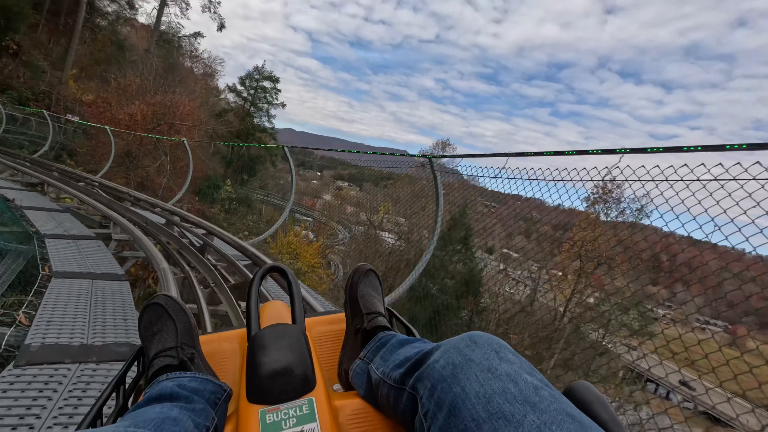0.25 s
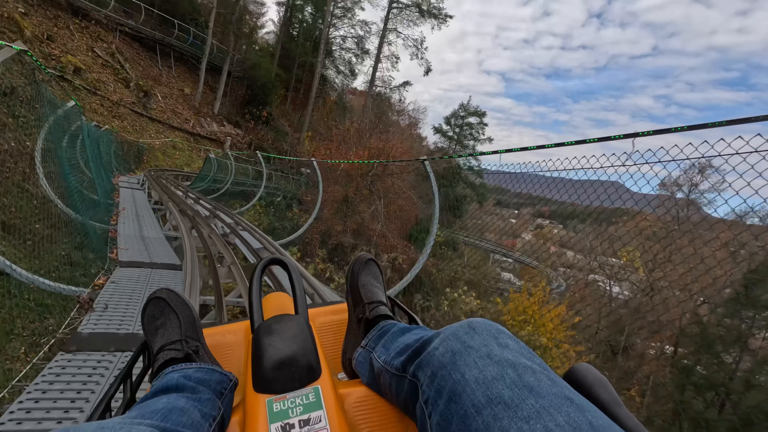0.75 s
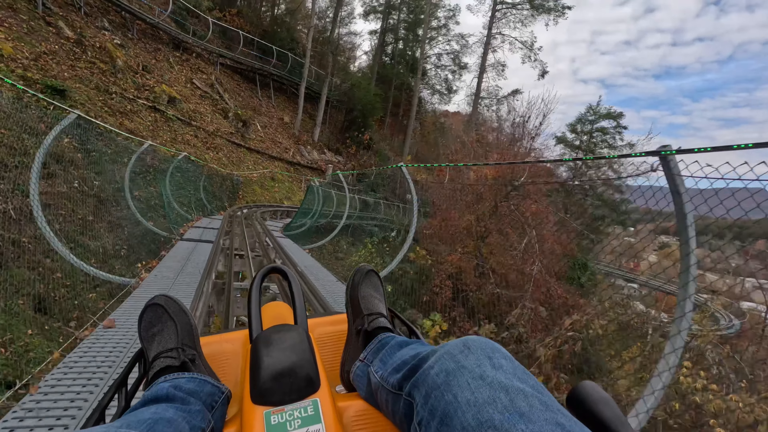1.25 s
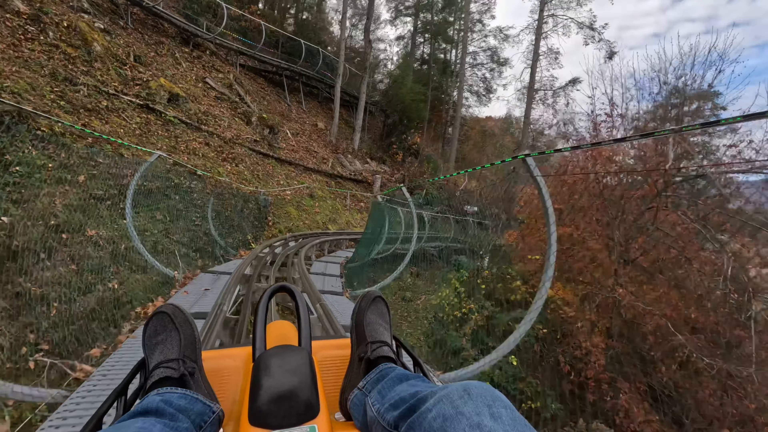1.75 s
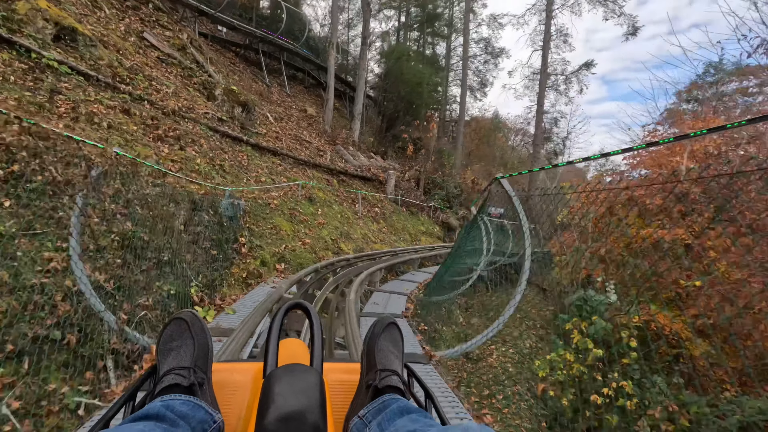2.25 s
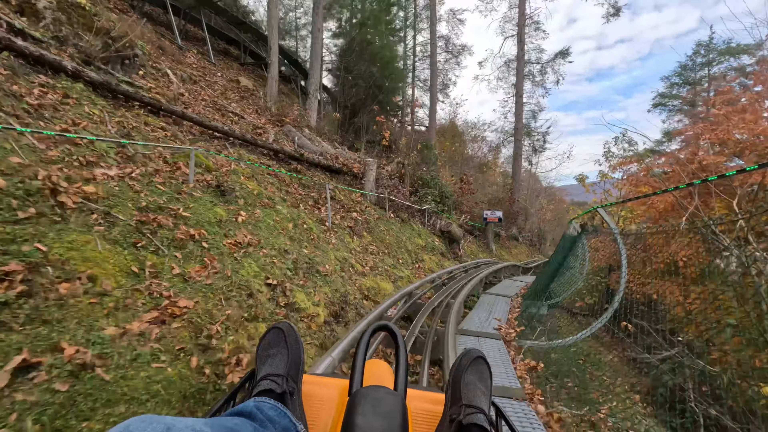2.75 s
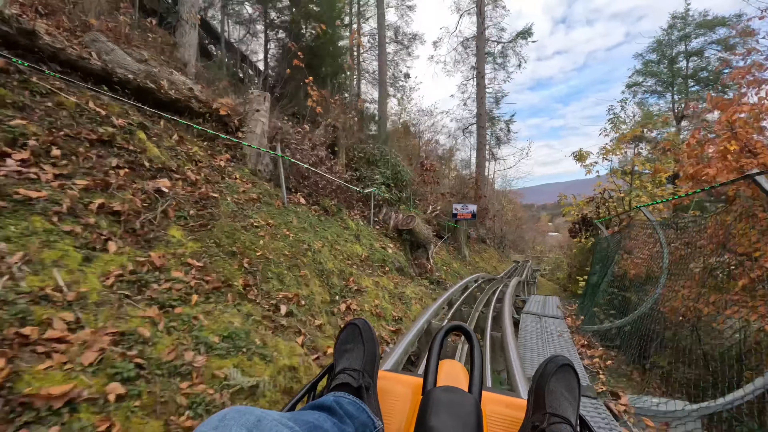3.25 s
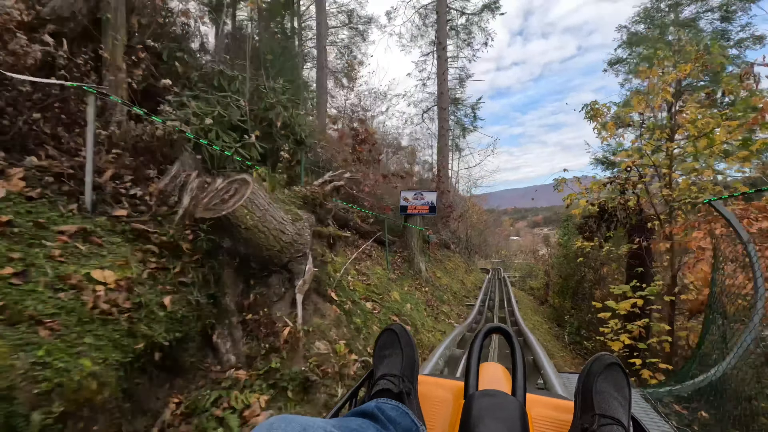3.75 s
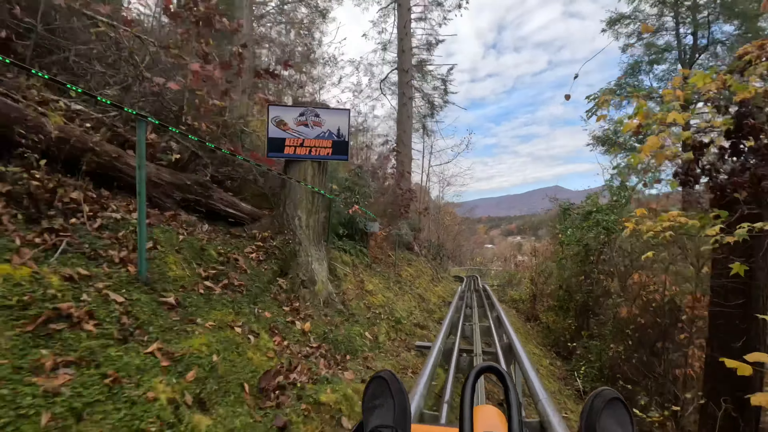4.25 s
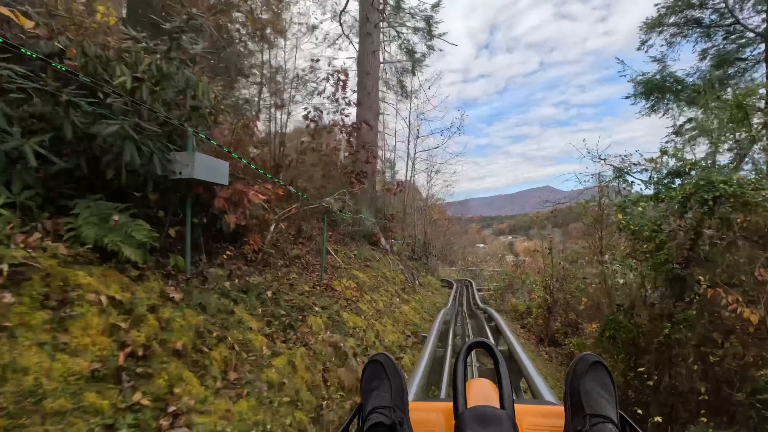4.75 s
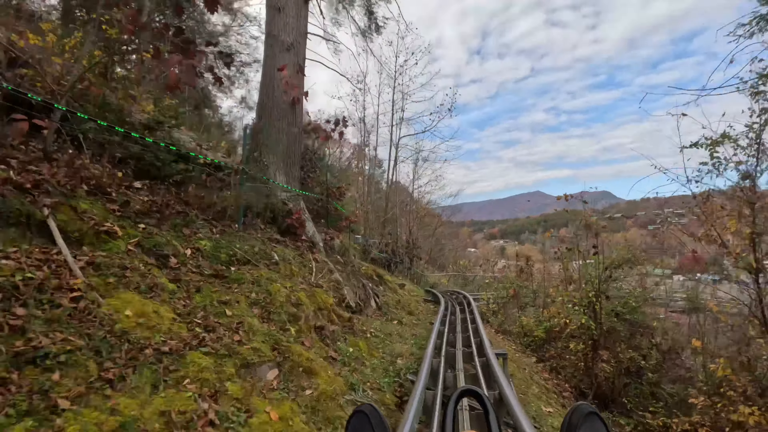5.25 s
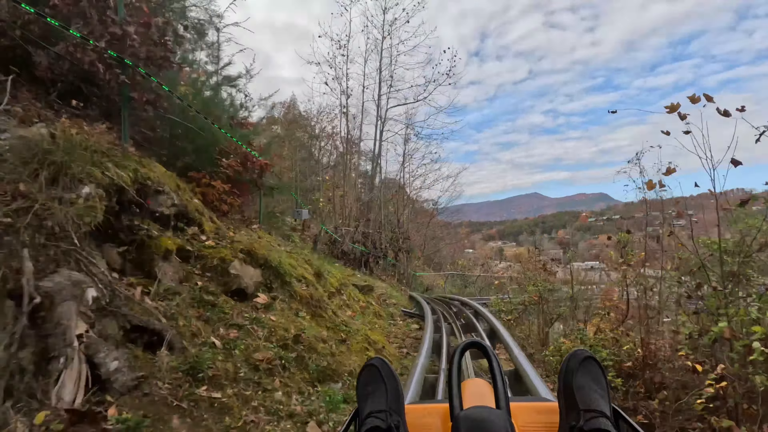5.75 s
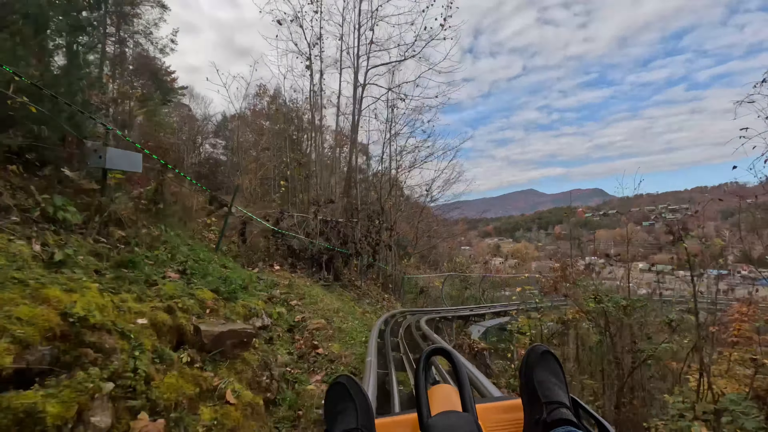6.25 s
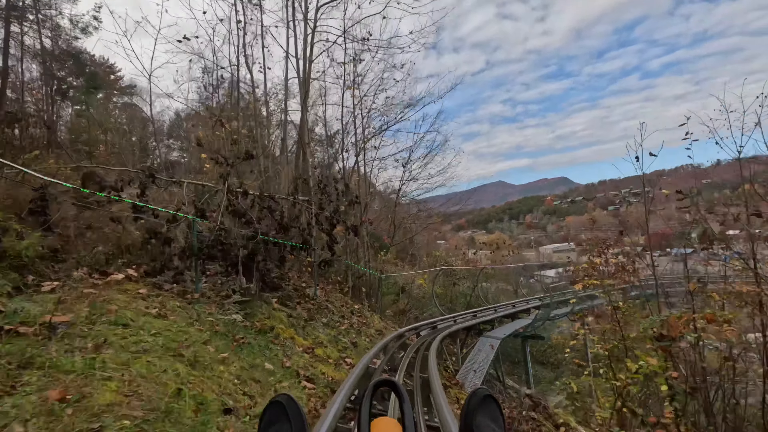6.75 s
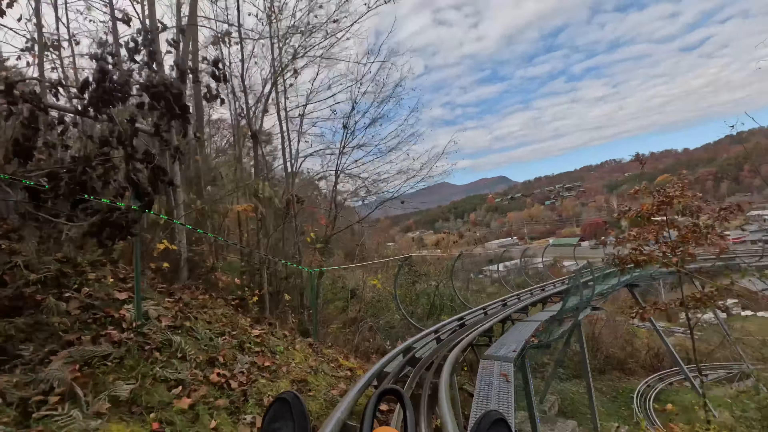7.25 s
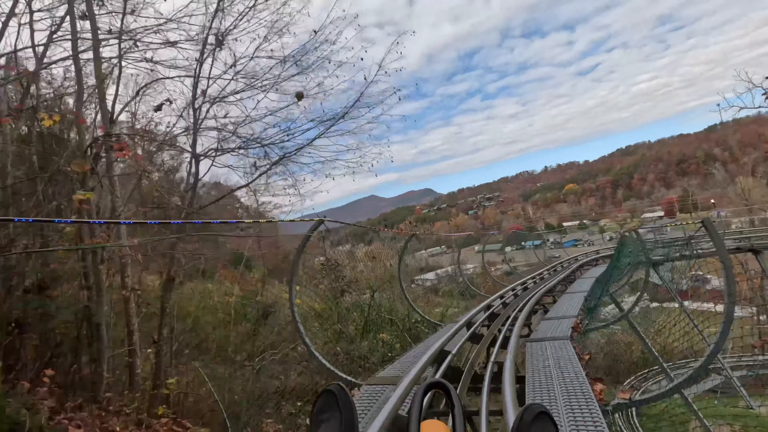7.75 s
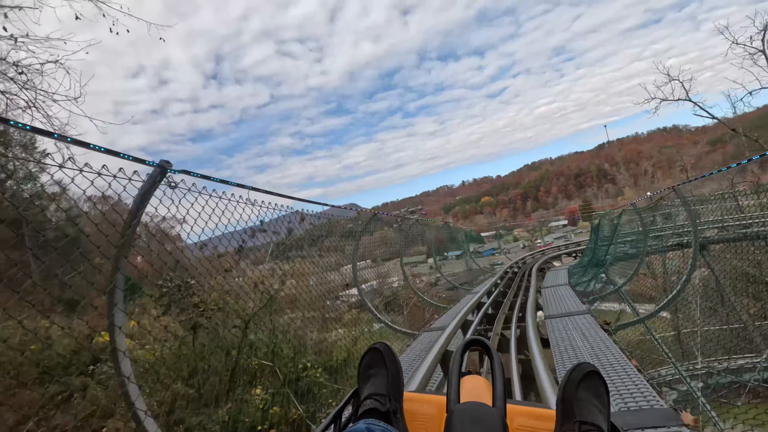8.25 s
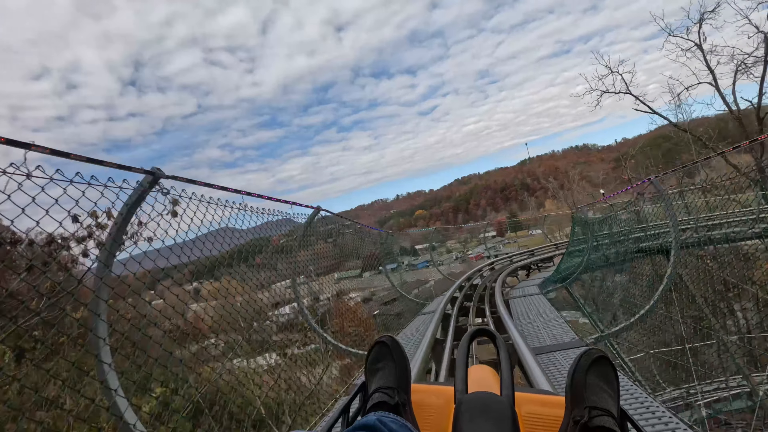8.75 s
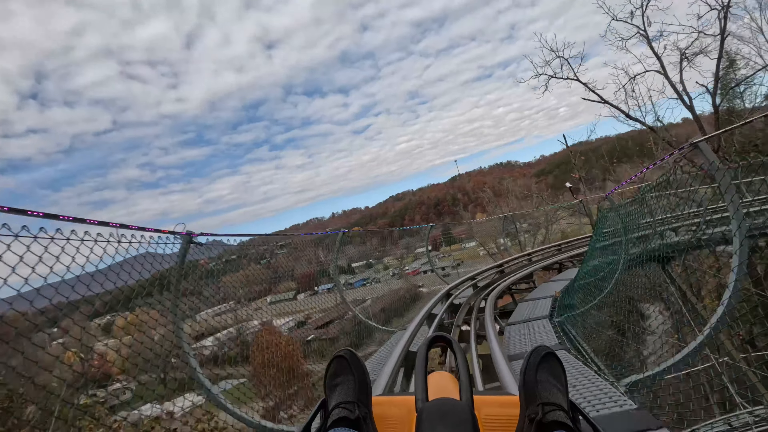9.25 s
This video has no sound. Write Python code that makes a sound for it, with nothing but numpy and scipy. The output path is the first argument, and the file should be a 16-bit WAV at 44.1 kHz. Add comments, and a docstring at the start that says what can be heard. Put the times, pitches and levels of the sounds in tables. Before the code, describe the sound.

Continuous close, rough ride noise in open hillside air: bassy wind bursts overload the microphone, over a midrange wheel rumble and thin contact hiss. The plastic hull hums and thumps. Short high squeaks occur only in the first second; afterwards wheels knock, frame parts rattle and scrape in uneven bunches. The loudest metallic hit comes near eight seconds, before a heavy rumbling finish without any stop.

```python
"""Wheels of a coaster sled roar, knock and flutter once a turn on a steel tube track on a hillside.
Grainy rail roughness rings their resonances; the listener rides in the seat.
The plastic hull drones and thumps; the chassis clanks and scrapes as shaped noise bursts.
A guide wheel squeaks early on in short tone bursts.
Wind noise and single eddies buffet the microphone and drive the recorder's limiter."""
import sys
import numpy as np
from scipy import signal
from scipy.fft import rfft, irfft
from scipy.io import wavfile
from scipy.ndimage import uniform_filter1d

SR = 44100
rng = np.random.default_rng(int(sys.argv[2]) if len(sys.argv) > 2 else 0)


def put_to_file(sound):
    """Save the sound as 16-bit audio at rate SR, in the file named by the first command-line argument."""
    columns = np.atleast_2d(sound).T  # one column per channel
    safe = np.clip(columns, -1, 1)
    whole_steps = np.round(safe * 32767)
    wavfile.write(sys.argv[1], SR, whole_steps.astype(np.int16))


N = 418931
TIME = np.arange(N) / SR


def from_db(db):
    """Decibels to gain."""
    return np.exp(np.log(10) * np.asarray(db) / 20)


def rms_one(x):
    """Scale to unit power."""
    return x / np.sqrt(np.mean(x ** 2) + 1e-20)


def in_time(rows):
    """Interpolate curve rows to one value per sample for each column."""
    s, *columns = np.transpose(rows)
    return [np.interp(TIME, s, c) for c in columns]


def noise():
    """White noise."""
    return rng.standard_normal(N)


def cut(x, hz, kind, order=2):
    """Butterworth filter."""
    return signal.sosfilt(signal.butter(order, hz, kind, fs=SR, output="sos"), x)


def drift(rate_hz):
    """Slow random curve with a spread of one; the first second of filter settling is dropped."""
    return rms_one(cut(rng.standard_normal(N + SR), rate_hz, "low")[SR:])


def colour(x, spectrum, size=8192):
    """Minimum-phase filter with the given spectrum; white noise keeps its power."""
    hz, db = np.transpose(spectrum)
    grid_hz = np.maximum(np.arange(size // 2 + 1) * SR / size, 1)
    gain = from_db(np.interp(np.log(grid_hz), np.log(hz), db))
    cepstrum = irfft(np.log(gain))
    # fold onto positive time: causal response
    cepstrum[1:size // 2] *= 2
    cepstrum[size // 2 + 1:] = 0
    response = irfft(np.exp(rfft(cepstrum)))
    return signal.fftconvolve(x, response / np.linalg.norm(response))[:N]


def resonate(x, hz, width_hz):
    """One two-pole resonance with a gain of one at its top."""
    r = np.exp(-np.pi * width_hz / SR)
    zeros = np.array([1, 0, -1]) * (1 - r * r) / 2
    poles = [1, -2 * r * np.cos(2 * np.pi * hz / SR), r * r]
    return signal.lfilter(zeros, poles, x)


def ring_through(x, modes):
    """Parallel resonances of alternating sign; their shares change as the point of contact moves."""
    out = np.zeros(N)
    for k, (hz, width_hz, db) in enumerate(modes):
        share = from_db(db + 1.9 * drift(9))
        out += (-1) ** k * share * resonate(x, hz, width_hz)
    return out


def narrow_noise(hz, waver_hz):
    """A tone whose strength and phase wander at random; unit power."""
    phase = 2 * np.pi * np.cumsum(hz) / SR
    return rms_one(drift(waver_hz) * np.cos(phase) + drift(waver_hz) * np.sin(phase))


def swell(s, rise_s, fade_s):
    """A smooth rise to a peak of one, then an exponential fade."""
    return np.exp(-np.where(TIME < s, ((TIME - s) / rise_s) ** 2 / 2, (TIME - s) / fade_s))


def bumps(rows):
    """Sum of Gaussian bumps in dB."""
    return sum(db * np.exp(-((TIME - s) / sigma_s) ** 2 / 2) for s, db, sigma_s in rows)


def grains(per_s, spread_db):
    """Tiny random impacts of uneven size; unit power."""
    hits = rng.random(N) < per_s / SR
    size = noise() * from_db(spread_db * np.clip(noise(), -2, 2))
    return rms_one(hits * size)


def add(out, s, sound):
    """Mix a short sound in at the given time."""
    room = out[int(s * SR):][:len(sound)]
    room += sound[:len(room)]


def scattered(per_s):
    """Uneven times: one at random in each stretch of equal length."""
    starts = np.arange(0, TIME[-1], 1 / per_s)[:-1]
    return starts + rng.random(len(starts)) / per_s


# air turbulence spectrum: pitch_hz [Hz], relative_density_db [dB per Hz]
WIND_SPECTRUM = [(10, -1.5), (22, -1.5), (40, 1.5), (70, -1), (125, -4.5), (190, -8.5), (310, -14.5),
                 (370, -19), (480, -24.5), (750, -31.5), (1300, -44), (3000, -82.5), (12000, -100)]
# gusts lifting the stream: center_s [s], lift_db [dB], sigma_s [s]
GUSTS = [(0.19, 4, 0.039), (.95, 2, 0.23), (2.04, 3.5, 0.059), (4.883, 1.5, 0.19), (5.142, 7, 0.028),
         (5.732, 2.5, 0.04), (6.76, 2.5, 0.24), (7.79, 1.5, 0.25), (8.2, 5, 0.05), (9.045, 0.5, 0.33)]
# brief lulls in the stream: center_s [s], drop_db [dB], sigma_s [s]
LULLS = [(0.292, 0, .025), (2.435, 5, 0.025), (2.66, 5, 0.017), (3.415, 1.5, 0.046), (4.119, 3.5, .035),
         (5.622, 12, 0.017), (5.853, 7, 0.02), (8.571, 2, 0.057)]
# stream level before trim; flutter relative to the stream level
AIR_DB, AIR_FLUTTER_DB = -13.5, -13.5
SWAY_DB, SWAY_RATE_HZ = 1.5, 5.5


def wind():
    """Lumpy turbulence on the microphone port: a deep rumble and a restless flutter above it."""
    air_db = AIR_DB + bumps(GUSTS) - bumps(LULLS)
    stream = colour(noise(), WIND_SPECTRUM)
    low = rms_one(cut(stream, 277, "low", order=4))
    high = rms_one(cut(stream, 322, "high", order=4))
    rumble = from_db(air_db + SWAY_DB * drift(SWAY_RATE_HZ) + 2.5) * low
    flutter = from_db(air_db + AIR_FLUTTER_DB + 3.06 * drift(21)) * high
    return rumble + flutter


def wheel_beat(turns_per_s, sharpness, uneven_db):
    """A worn spot meets the rail once a turn, with a force drawn anew for each turn."""
    turns = np.cumsum(turns_per_s * (1 + 0.021 * drift(10.4))) / SR
    turn_force = from_db(uneven_db * rng.standard_normal(1000))
    force = turn_force[turns.astype(int) % 1000]
    return rms_one(force * np.exp(-sharpness * np.cos(2 * np.pi * turns)))


def grit():
    """Specks and pits on the rail give sparse, irregular ticks of equal size."""
    return rms_one(np.sign(grains(130, spread_db=0)))


# stretches where a loose wheel rattles: center_s [s], level_db [dB], half_length_s [s]
WHEEL_RATTLES = [(.6, -32, 0.25), (3.348, -39, 0.61), (8.05, -32, .15), (8.516, -36, 0.29),
                 (8.925, -36.5, 0.24)]
# rattle spectrum: pitch_hz [Hz], relative_density_db [dB per Hz]
RATTLE_SPECTRUM = [(400, -29), (800, -13.5), (1030, 12), (1250, 3.5), (1550, 4.5), (1850, -7), (3200, -9.5),
                   (4000, -17.5), (8000, -44), (13000, -78)]


def wheel_rattle(beat):
    """A loose wheel gives one short gritty tick a turn."""
    level = np.zeros(N)
    for s, db, half_length_s in WHEEL_RATTLES:
        level += from_db(db) * np.exp(-((TIME - s) / half_length_s) ** 4 / 2)
    ticks = beat ** 1.3 * grains(3200, spread_db=-2.5)
    return level * rms_one(colour(ticks, RATTLE_SPECTRUM))


# wheel speed: time_s [s], turns_per_s [1/s]
WHEEL_SPEED = [(0, 39), (1.9, 35.6), (3.9, 37), (7.4, 41), (7.95, 36), (8.45, 36.5), (9.5, 33.6)]
# how hard the wheels beat once a turn: time_s [s], depth [0-1]
FLUTTER = [(0, .3), (.7, 0), (1.6, 0.6), (2.7, 0.2), (3.2, 0.3), (4.1, 0.2), (5.4, 0.5), (5.95, 1),
           (6.5, 0), (7.6, 0.3), (8.05, 0.5), (8.9, 0)]
# wheel roar, louder where bends press on the rail: time_s [s], level_db [dB before trim]
ROAR_LEVEL = [(0.0, -32), (1.11, -29.5), (1.64, -36.5), (2.27, -34), (2.46, -35.5), (2.8, -35.5),
              (3.09, -28.5), (3.86, -28.5), (4.29, -33), (6.43, -37), (6.88, -30.5), (7.06, -33.5),
              (8.09, -28.5), (8.47, -30), (9.02, -23.5), (9.5, -28.5)]
# hiss at the contact of wheel and rail: time_s [s], level_db [dB before trim]
HISS_LEVEL = [(0.0, -42), (0.58, -46), (0.74, -40), (0.92, -36), (1.12, -40), (1.38, -45), (2.25, -45),
              (2.43, -51.5), (2.67, -49), (3.04, -45.5), (3.55, -44), (3.68, -41), (3.92, -41),
              (4.15, -45.5), (5.69, -43), (6.48, -46), (6.82, -40), (7.06, -46), (8.23, -40.5),
              (9.5, -41.5)]
# wheel and rail resonances: pitch_hz [Hz], width_hz [Hz], relative_level_db [dB]
ROAR_MODES = [(537, 83, 3), (727, 280, 1.5), (983, 192, 6.5), (1142, 166, 4.5), (1405, 364, -1.5),
              (1640, 120, -3)]
# ring of the steel frame: pitch_hz [Hz], width_hz [Hz], relative_level_db [dB]
STEEL_MODES = [(2090, 280, -1.5), (2710, 150, 0), (3040, 100, -0.5), (3360, 91, -1), (3490, 81, 0),
               (4235, 190, -2), (4550, 220, -6), (5330, 170, -16), (6350, 190, -30.5), (8300, 170, -28)]
# contact hiss spectrum: pitch_hz [Hz], relative_density_db [dB per Hz]
HISS_SPECTRUM = [(1000, 5.5), (1700, 6.5), (2200, 1), (3150, 0), (3700, -3), (4300, -6), (5200, -9.5),
                 (6500, -14), (8200, -15.5), (9600, -22), (11500, -28.5), (14000, -53.5), (16000, -65.5)]
# rail roughness changes at random; the hiss takes a share of the swing
ROUGH_PATCH_DB, PATCH_RATE_HZ, HISS_SHARE = 2, 6.3, 1
GRIT_DB = -2.5  # relative to the fine roughness


def wheels():
    """Rail roughness rings the wheels and tubes and hisses at the contact; the load beats once a turn."""
    turns_per_s, = in_time(WHEEL_SPEED)
    roar_db, = in_time(ROAR_LEVEL)
    hiss_db, = in_time(HISS_LEVEL)
    depth = np.clip(in_time(FLUTTER)[0], 0, 1)
    patch_db = ROUGH_PATCH_DB * drift(PATCH_RATE_HZ)
    beat = wheel_beat(turns_per_s, sharpness=1.5, uneven_db=1.3)
    load = rms_one(1 - depth + depth * beat)
    roughness = grains(6000, spread_db=-1) * load + from_db(GRIT_DB) * grit()
    roar = ring_through(rms_one(roughness), ROAR_MODES)
    roar = rms_one(cut(roar, 2200, "low", order=3))
    hiss = rms_one(colour(noise(), HISS_SPECTRUM))
    # small loose parts jingle at random, each on one note of the frame
    jingle = np.zeros(N)
    for hz, width_hz, db in STEEL_MODES:
        jingle += from_db(db / 2) * resonate(grains(120, spread_db=3), hz, width_hz)
    treble = hiss + from_db(-13.5) * rms_one(jingle)
    roar_gain = from_db(roar_db + patch_db - 1.9)
    treble_gain = from_db(hiss_db + HISS_SHARE * patch_db + 5.5)
    return wheel_rattle(beat) + roar_gain * roar + treble_gain * treble


# a brief chattering contact shares its force out anew among the resonances
KNOCK_T60_S, KNOCK_SCATTER_DB = 0.026, 3.5


def knock(peak_db, dull_db_per_octave, size=4096):
    """One blow of a wheel on the rail, ringing briefly in their resonances."""
    contact = rng.standard_normal(size) * from_db(-60 * TIME[:size] / KNOCK_T60_S)
    ring = np.zeros(size)
    for k, (hz, width_hz, mode_db) in enumerate(ROAR_MODES):
        scatter_db = KNOCK_SCATTER_DB * rng.standard_normal()
        share = from_db(mode_db + scatter_db - dull_db_per_octave * np.log2(hz))
        ring += (-1) ** k * share * resonate(contact, hz, width_hz)
    ring = cut(ring, 2400, "low")
    return from_db(peak_db) * ring / np.abs(ring).max()


# hard knocks on the rail: start_s [s], peak_db [dB], dullness_db_per_octave [dB per octave]
KNOCKS = [(.351, -23, 0), (.405, -19, 7), (.488, -23, 20), (.668, -13, -3), (.887, -16, -3), (.995, -8, 12),
          (1.102, -12, 3), (1.19, -13, 0), (1.231, -10, 0), (1.321, -11, 8), (1.482, -20, -1),
          (2.152, -11, 7), (2.178, -13, 0), (2.198, -21, -4), (2.256, -15, 13), (2.714, -14.5, -4),
          (2.902, -14, -4), (2.996, -11.5, 0), (3.105, -22, -4), (3.43, -17, -2), (3.481, -17.5, -3),
          (3.633, -13, 0), (4.37, -17, -13), (4.557, -21, 8), (5.157, -12, -5), (5.477, -10.5, 12),
          (5.535, -15, 4), (5.553, -11, 1), (5.567, -12, -1), (5.672, -18, 8), (5.756, -11, 2),
          (6.101, -15.5, -4), (6.7, -12.5, 9), (6.733, -13, 10), (6.767, -20, 1), (6.784, -23, 6),
          (6.806, -15, 0), (6.829, -12.5, -16), (6.967, -13, -6), (8.203, -7, 0), (8.228, -13, 9),
          (8.776, -17, 0), (8.82, -13, 0), (8.868, -9.5, 4), (9.214, -6, 0), (9.278, -13, 0)]
# light knocks; peak relative to the ROAR_LEVEL curve
LIGHT_KNOCKS_PER_S, LIGHT_KNOCK_DB, LIGHT_KNOCK_SPREAD_DB = 36, 6.5, 1.3


def knocks():
    """Play in the wheels lets them knock on the rail: hard at bumps, lightly all along the track."""
    out = np.zeros(N)
    for s, peak_db, dull_db in KNOCKS:
        add(out, s, knock(peak_db, dull_db))
    for s in scattered(LIGHT_KNOCKS_PER_S):
        roar_db = np.interp(s, *np.transpose(ROAR_LEVEL))
        spread_db = LIGHT_KNOCK_SPREAD_DB * rng.standard_normal()
        add(out, s, knock(roar_db + LIGHT_KNOCK_DB + spread_db, 0))
    return out


# stretches of rail that set the hull droning: start_s [s], end_s [s], level_db [dB], pitch_hz [Hz]
DRONES = [(0, 0.86, -21.5, 210), (0.858, 2.045, -14.5, 209.5), (2.938, 3.103, -21, 208.5),
          (4.288, 5.106, -16.5, 204.9), (5.1, 5.955, -20.5, 212.2), (6.556, 7.309, -24, 183.2),
          (8.091, 8.268, -17, 194.1)]
DRONE_ATTACK_S, DRONE_RELEASE_S, DRONE_IDLE_DB = 0.08, 0.039, -27
# pitch waver; noise gain beside the tone
DRONE_WAVER_HZ, DRONE_WAVER_RATE_HZ, DRONE_NOISE = 4.2, 12, 0.55
# uneven track shakes the frame: peak_s [s], level_db [dB], rise_s [s], center_hz [Hz]
SHUDDERS = [(4.031, -15, 0.61, 114), (4.55, -12.5, 0.061, 140), (5.721, -15.5, 0.32, 122),
            (6.75, -16, 0.17, 165), (7.551, -15, 0.47, 155), (9.18, -11.5, 0.28, 118)]
SHUDDER_FADE_S = 0.024


def hull():
    """The rails drive a narrow, wavering drone into the plastic shell and a broader shudder into the frame."""
    drone_hz, = in_time([((start + end) / 2, hz) for start, end, db, hz in DRONES])
    drive = from_db(DRONE_IDLE_DB)
    for start, end, db, hz in DRONES:
        attack = np.clip(1 + (TIME - start) / DRONE_ATTACK_S, 0, 1)  # full at start
        release = np.exp(-np.maximum(TIME - end, 0) / DRONE_RELEASE_S)
        drive = np.maximum(drive, from_db(db) * attack * release)
    wavering_hz = drone_hz + DRONE_WAVER_HZ * drift(DRONE_WAVER_RATE_HZ)
    phase = 2 * np.pi * np.cumsum(wavering_hz) / SR
    tone = (1 + 0.33 * drift(11)) * np.cos(phase)
    drone = rms_one(tone + DRONE_NOISE * narrow_noise(drone_hz, waver_hz=20))
    shake = sum(from_db(db) * swell(s, rise_s, SHUDDER_FADE_S) for s, db, rise_s, hz in SHUDDERS)
    shake_hz, = in_time([(s, hz) for s, db, rise_s, hz in SHUDDERS])
    return drive * drone + shake * narrow_noise(shake_hz, waver_hz=24.3)


# THUMP_DB: peak of the envelope at the lowest pitch
THUMPS_PER_S, THUMP_DB, THUMP_T60_S = 18, -17.5, 0.08
THUMP_LOW_HZ, THUMP_HIGH_HZ, THUMP_DB_PER_OCTAVE = 250, 558.6, -7


def thumps(size=8192):
    """Jolts make the hull's panels thump at random pitches; the smaller ones sound higher and weaker."""
    out, age = np.zeros(N), TIME[:size]
    envelope = from_db(-60 * age / THUMP_T60_S) * (1 - np.exp(-age / 0.0029))
    envelope = envelope / envelope.max()
    for s in scattered(THUMPS_PER_S):
        octaves = rng.random() * np.log2(THUMP_HIGH_HZ / THUMP_LOW_HZ)
        gain = from_db(THUMP_DB + THUMP_DB_PER_OCTAVE * octaves)
        tone = np.sin(2 * np.pi * THUMP_LOW_HZ * 2 ** octaves * age)
        add(out, s, gain * envelope * tone)
    return out


# guide wheel squeaks in the first bend: center_s [s], level_db [dB], pitch_hz [Hz]
SQUEAKS = [(.028, -37, 3110), (.077, -37, 3380), (.111, -35, 3420), (.293, -31, 3360), (0.327, -33, 3060),
           (.436, -41.5, 3060), (.455, -37, 3480), (.511, -35, 3430), (.564, -40, 3430), (.64, -30, 3430),
           (.67, -39, 3560), (.713, -35, 3400), (.758, -30, 3090), (.836, -36, 3110)]


def squeaks():
    """A guide wheel sticks and slips for a few milliseconds in the bend."""
    out = np.zeros(N)
    for s, db, hz in SQUEAKS:
        envelope = np.exp(-((TIME - s) / 0.0039) ** 2)
        out += from_db(db) * envelope * np.sin(2 * np.pi * hz * TIME)
    return out * (1 + 0.18 * drift(250))


# strongest eddies on the microphone: start_s [s], drive_db [dB]
EDDIES = [(0.078, -11), (0.207, -5), (0.344, -8.5), (0.405, -11), (0.486, -11), (0.724, -8.5),
          (0.993, -2.5), (1.229, -8.5), (1.262, -6.5), (1.319, -9), (1.395, -9), (1.796, -13),
          (2.102, -11.5), (2.255, -16), (2.38, -16), (2.61, -16), (2.968, -11), (3.209, -12), (3.27, -19),
          (3.3, -10.5), (3.649, -17.5), (3.793, -10), (3.852, -11.5), (3.993, -9), (4.024, -10),
          (4.19, -12), (4.554, -10), (4.803, -8.5), (5.476, -7.5), (5.672, -11.5), (5.754, -10.5),
          (6.404, -17), (6.627, -19), (6.729, -11.5), (6.777, -11.5), (6.812, -11.5), (7.212, -14.5),
          (8.64, -11.5), (9.116, -6.5), (9.168, -7), (9.203, -7), (9.327, -6.5)]
# eddy spectrum at the port: pitch_hz [Hz], relative_density_db [dB per Hz]
EDDY_SPECTRUM = [(60, -7.5), (170, 5), (300, 6), (440, -3), (580, -5), (830, -20.5), (1080, -17.5),
                 (1550, -27), (2000, -39), (4000, -49.5), (12000, -91)]
EDDY_ATTACK_S, EDDY_LENGTH_S = 0.0025, 0.035


def eddies():
    """Single eddies burst on the port: a sudden thump that reaches up into the midrange and dies away."""
    burst = np.zeros(N)
    for s, db in EDDIES:
        span = (TIME >= s) & (TIME < s + 0.2)
        age = TIME[span] - s
        attack = 1 - np.exp(-age / EDDY_ATTACK_S)
        decay = np.exp(-(1.255 * age / EDDY_LENGTH_S) ** 2)
        burst[span] += from_db(db) * attack * decay
    swirl = colour(noise(), EDDY_SPECTRUM)
    swirl = swirl / np.sqrt(uniform_filter1d(swirl ** 2, size=400))  # one eddy pushes with an even force
    thump = rms_one(cut(resonate(noise(), 150, 76), 260, "low"))
    return burst * (swirl + from_db(-3.5) * thump)


# chassis clanks: start_s [s], drive_db [dB], body_db [dB relative to drive]
CLANKS = [(.1, -25, 11), (0.174, -22.5, 8.5), (.344, -22, -8), (1.592, -22, 4.5), (1.755, -21, 6.5),
          (1.898, -21, 7), (2.44, -30, 10), (2.715, -26.5, 7), (3.996, -19, 5), (4.329, -29, -10),
          (4.371, -25.5, 1), (4.54, -24.5, -2), (4.626, -24.5, -16), (5.047, -16, -8), (5.149, -9.5, -5),
          (5.419, -26, -8), (5.457, -17.5, -14), (5.503, -19, -3), (5.669, -24.5, -5), (5.964, -27, 5),
          (6.099, -19.5, 7), (6.128, -21.5, -2), (6.556, -19.5, 4), (6.675, -17, -1), (6.688, -11, -10),
          (6.747, -20.5, 8), (6.763, -30, 0), (6.826, -17.5, -5), (6.852, -24, 1), (6.897, -17, -5),
          (6.92, -25, -2), (6.944, -21, 6), (6.986, -22, 6.5), (7.303, -27, -5), (7.404, -28, -12),
          (7.894, -26, -10), (7.96, -15.5, -6), (8.2, -6, 0.5), (8.224, -11, -2), (8.561, -18, 1),
          (8.777, -21, -8), (8.82, -12, 4)]
# guide wheels scraping the rail: peak_s [s], drive_db [dB], rise_s [s]
SCRAPES = [(.205, -27.5, 0.027), (2.18, -25.5, 0.028), (2.29, -31.5, 0.0084), (2.988, -25, 0.025),
           (5.11, -30, 0.02), (5.154, -22, 0.011), (5.5, -24.5, 0.027), (5.77, -26, 0.01),
           (5.941, -29, .006), (6.109, -25, 0.022), (6.694, -23, 0.018), (6.939, -28, 0.041),
           (7.671, -21, 0.035), (8.236, -19.5, 0.025), (8.835, -23.5, 0.017), (9.31, -24, 0.04)]
# clank and scrape spectrum: pitch_hz [Hz], relative_density_db [dB per Hz]
CHASSIS_SPECTRUM = [(300, -36), (520, 20), (800, 11), (1200, 11), (2100, 2), (3300, 2), (4200, -1.5),
                    (5500, -8), (7000, -13.5), (8600, -18), (11500, -26.5), (15000, -50)]
CLANK_ATTACK_S, CLANK_T60_S = 0.00099, 0.063
# parts go on rattling raggedly after each clank
AFTER_RATTLE_DB, AFTER_RATTLE_T60_S, RAGGED_DB = -25, 0.11, 7
# fade: a base plus a multiple of the rise
SCRAPE_FADE_S, FADE_PER_RISE = 0.011, 1.2


def chassis():
    """Loose steel parts strike and chatter briefly; the guide wheels scrape in longer swells."""
    force, body, scrape = np.zeros((3, N))
    ragged = from_db(RAGGED_DB * drift(90))
    for s, db, body_db in CLANKS:
        span = (TIME >= s) & (TIME < s + 0.5)
        age = TIME[span] - s
        strike = from_db(-60 * age / CLANK_T60_S)
        after = ragged[span] * from_db(AFTER_RATTLE_DB - 60 * age / AFTER_RATTLE_T60_S)
        blow = from_db(db) * (strike + after) * (1 - np.exp(-age / CLANK_ATTACK_S))
        force[span] += blow
        body[span] += blow * from_db(body_db)
    for s, db, rise_s in SCRAPES:
        scrape += from_db(db) * swell(s, rise_s, SCRAPE_FADE_S + FADE_PER_RISE * rise_s)
    chatter = grains(3200, spread_db=0)
    crack = cut(cut(chatter * force, 2200, "high"), 16000, "low", order=1)
    thud = cut(chatter * body, 2600, "low", order=3)
    catching = from_db(1.5 * drift(70))  # the contact catches and lets go
    scraping = scrape * catching * grains(9000, spread_db=2.5)
    ring_drive = from_db(2.5) * force * chatter + from_db(-17.5) * scraping
    direct = from_db(-2) * (crack + thud) + scraping
    return colour(direct, CHASSIS_SPECTRUM) + ring_through(ring_drive, STEEL_MODES)


# hard wind slaps: center_s [s], level_db [dB], sigma_s [s], resonance_hz [Hz]
SLAPS = [(1.326, -19.5, 0.0046, 970), (1.756, -26.5, .004, 1480), (1.772, -22.5, 0.0062, 1320),
         (2.024, -17, 0.0039, 1330), (2.035, -12, 0.0092, 760), (2.167, -8.5, 0.021, 374),
         (2.18, -17, 0.016, 1230), (2.302, -26, 0.0065, 1340), (4.056, -21.5, 0.018, 1070),
         (5.557, -14, 0.012, 594), (5.561, -23, 0.011, 1230), (5.586, -22, 0.0051, 1300),
         (5.591, -26.5, 0.004, 1540), (6.99, -23.5, 0.013, 1360)]


def slaps():
    """The hardest gusts tear at the port with a short, hollow rasp."""
    out = np.zeros(N)
    turbulence = noise()
    for s, db, sigma_s, hz in SLAPS:
        span = np.abs(TIME - s) < 0.1
        hollow = resonate(turbulence[span], hz, 0.61 * hz)
        rasp = rms_one(cut(hollow, 0.82 * hz, "low"))
        out[span] += from_db(db) * np.exp(-((TIME[span] - s) / sigma_s) ** 2 / 2) * rasp
    return out


def scene():
    """Everything rides along with the microphone, in open air."""
    air = wind() + eddies() + slaps()
    sled = wheels() + knocks() + squeaks() + hull() + thumps() + chassis()
    return (air + sled)[None]


def limiter(x, ceiling, release_db_per_s):
    """Peaks pull the gain down within milliseconds; it recovers steadily in dB."""
    over_db = 20 * np.log10(np.maximum(np.abs(x) / ceiling, 1))
    ramp_db = release_db_per_s * TIME
    held_db = np.maximum.accumulate(over_db + ramp_db, axis=-1) - ramp_db
    smooth_db = uniform_filter1d(uniform_filter1d(held_db, size=96), size=64)
    return x * from_db(-smooth_db)


CUTOFF_HZ = 15500


def record(dry):
    """The bass is limited on its own, then the whole; what still overshoots is clipped, and the top is cut."""
    bass = signal.sosfiltfilt(signal.butter(2, 170, fs=SR, output="sos"), dry)
    tamed = limiter(bass, ceiling=0.61, release_db_per_s=132) + dry - bass
    limited = limiter(tamed, ceiling=0.96, release_db_per_s=400)
    return cut(np.clip(limited, -1, 1), CUTOFF_HZ, "low", order=12)


dry = scene()
out = record(dry)
put_to_file(out)
```